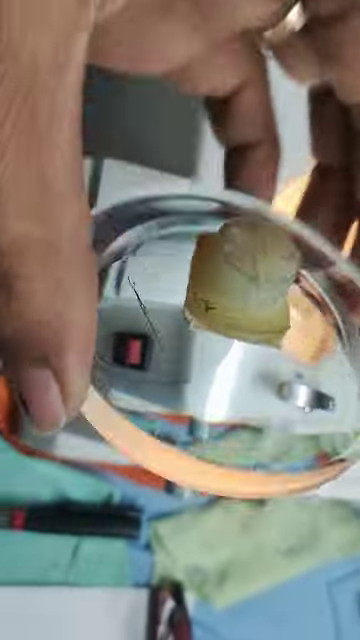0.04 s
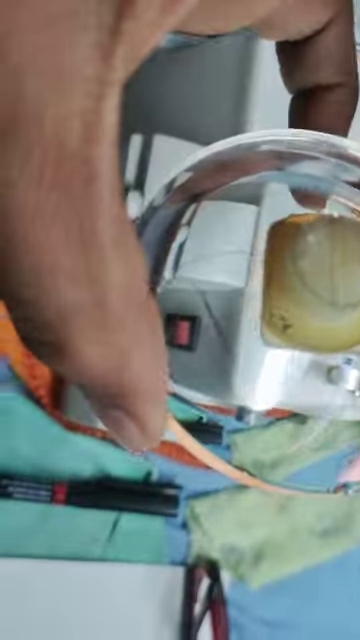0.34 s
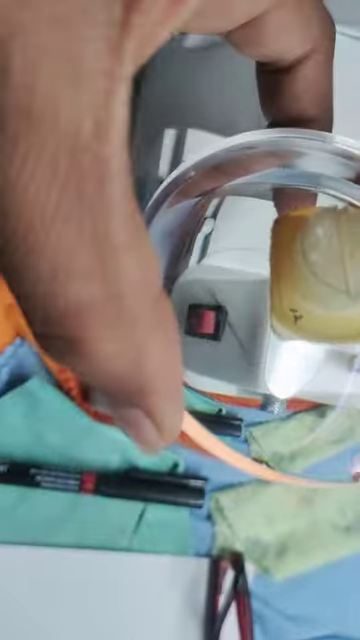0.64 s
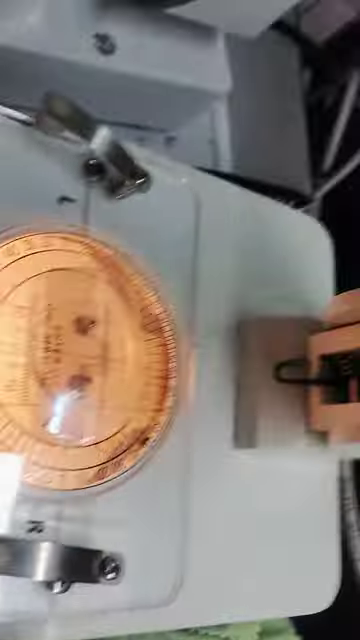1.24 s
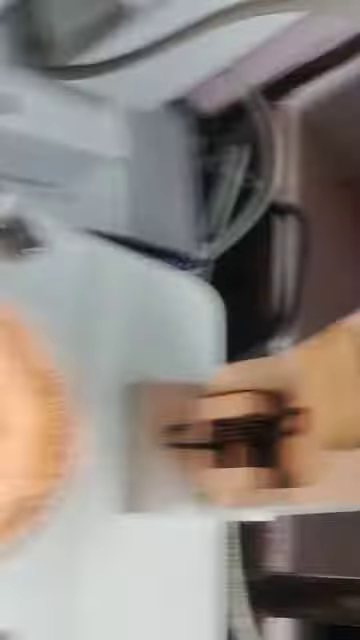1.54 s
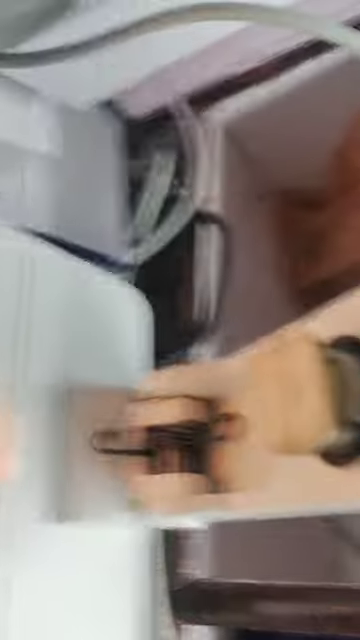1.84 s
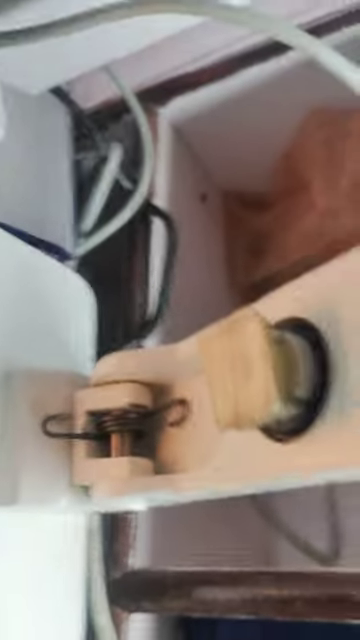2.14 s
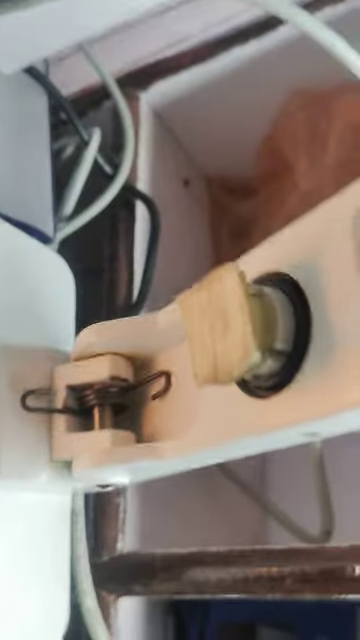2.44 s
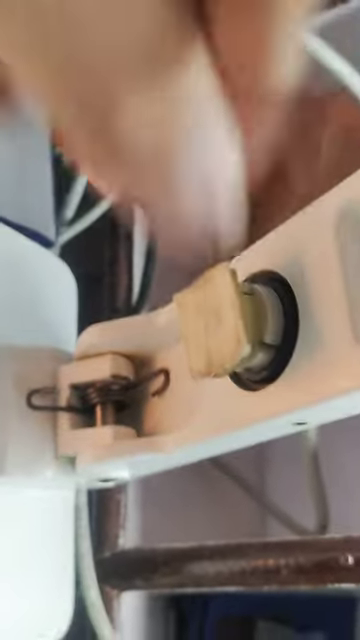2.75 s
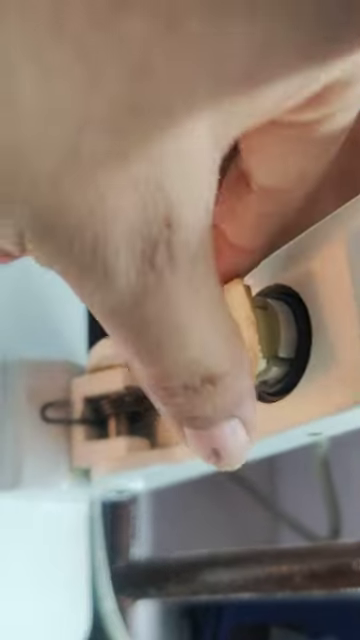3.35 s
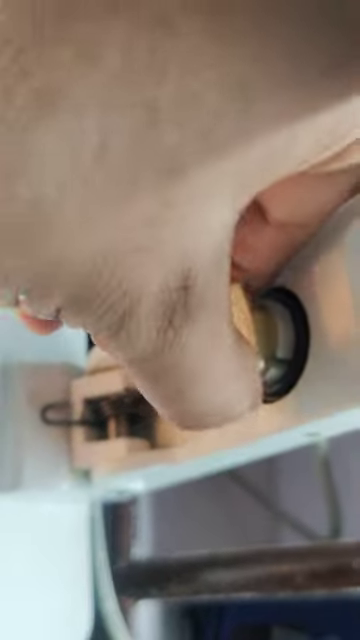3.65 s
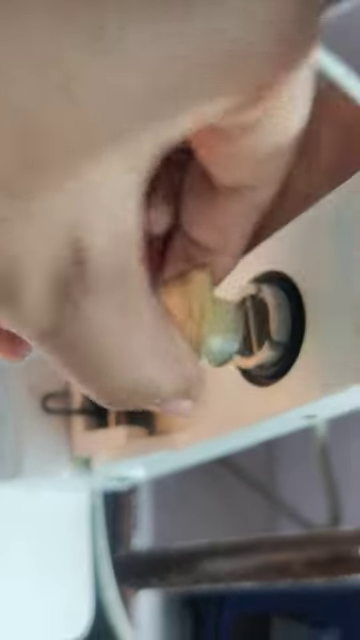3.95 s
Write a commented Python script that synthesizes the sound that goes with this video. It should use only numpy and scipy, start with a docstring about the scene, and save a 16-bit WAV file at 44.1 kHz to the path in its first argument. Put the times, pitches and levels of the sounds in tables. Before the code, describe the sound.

Close grinding machine whine stops suddenly, leaving light handling scrapes, ticks and a low rumble.

```python
"""A lens grinding machine runs close by: a harmonic motor whine over a rasping wheel, whose friction
noise is shaped by the resonances of the housing. An edit cuts it off abruptly. Hands then brush and tap
the housing and the camera, with scrapes, stick-slip squeaks, ticks and dull knocks. A far engine swells
twice through the walls, over the low rumble of a small workshop. The right channel is muffled."""
import sys
import numpy as np
from scipy import signal
from scipy.fft import rfft, irfft
from scipy.io import wavfile

SR = 44100
rng = np.random.default_rng(int(sys.argv[2]) if len(sys.argv) > 2 else 0)


def output_pcm(signal):
    """Save a mono or channel-first signal as 16-bit PCM at the path in sys.argv[1].

    Samples are clipped to [-1, 1] before scaling.
    """
    pcm = np.clip(np.atleast_2d(signal).T, -1, 1) * 32767
    wavfile.write(sys.argv[1], SR, np.round(pcm).astype(np.int16))


N = 176400
T, HZ = np.arange(N) / SR, np.fft.rfftfreq(N, 1 / SR)

CUT_S, CUT_FADE_S = 0.8645, 0.0017
MOTOR_HZ, SAG_HZ_PER_S = 164.1, 0.8
def grinder():
    """Rotation: one shaft paces whine and rasp; the sound eases slightly until an edit cuts it off."""
    shaft_phase = phase(MOTOR_HZ - SAG_HZ_PER_S * T + 0.15 * drift(14))
    whine = motor_whine(shaft_phase) * amp(-2.5 * T)
    grinding = (side_tones() + wheel_rasp(shaft_phase)) * amp(-0.5 * T)
    rings = wheel_rings() * amp(-18.5 * T)
    cut_gate = np.exp(-np.maximum(T - CUT_S, 0) / CUT_FADE_S)
    return cut_gate * (whine + grinding + rings)


# Harmonics of the shaft rate: harmonic_number, relative_db
MOTOR_HARMONICS = [(1, -11.5), (2, -5.5), (3, 3), (4, -5), (5, 0.5), (6, 0.5), (7, 1.5), (8, 1), (9, -16),
                   (10, -17), (11, -4), (12, 3), (13, -10.5), (14, -10), (15, -21), (17, -7), (18, -6)]
# The fifth harmonic starts strong and sinks: time_s, gain_db
FIFTH_FADE = [(0.24, 5.5), (0.44, -2.5)]
def motor_whine(shaft_phase, level_db=-26):
    """Periodic motion radiates a harmonic series; each partial wavers slightly in level."""
    whine = np.zeros(N)
    for harmonic, db in MOTOR_HARMONICS:
        if harmonic == 5:
            db = db + np.interp(T, *np.transpose(FIFTH_FADE))
        whine += amp(db + 0.8 * drift(37)) * np.cos(harmonic * shaft_phase + 2 * np.pi * rng.random())
    return amp(level_db) * unit(whine)


# Friction spectrum of the wheel: frequency_hz, relative_db
RASP_SPECTRUM = [(60, -18), (130, -5.5), (250, -11.5), (800, -0.5), (3000, 0.5), (6500, -0.5), (8200, -6),
                 (12500, -18.5), (15500, -4)]
# Resonances and antiresonances of the housing: centre_hz, half_width_hz, gain_db
HOUSING_MODES = [(529, 37, 13.5), (605, 21, -9), (697, 28, 10.5), (790, 38, -5.5), (1046, 147, 10.5),
                 (1540, 51, -5.5), (1685, 176, 9.5), (1883, 45, 10), (2930, 130, -9), (3605, 250, 6),
                 (3916, 71, 8.5), (4320, 38, 9.5), (4984, 115, -41), (5480, 52, -14), (6030, 140, 5),
                 (8350, 100, -10), (9400, 130, -15), (10480, 990, 8.5), (10870, 180, -15)]
def wheel_rasp(shaft_phase, level_db=-22.5, treble_hz=2850, dulling_db_per_s=7):
    """Source and filter: friction noise, coloured by the housing, pulses with each turn and dulls."""
    housing_db = sum(db * bell(HZ, hz, width) for hz, width, db in HOUSING_MODES)
    rasp = casing_reflections(noise(spectrum(RASP_SPECTRUM) + housing_db))
    rasp *= 1 + 0.048 * np.cos(shaft_phase)
    treble = irfft(rfft(rasp) / (1 + (treble_hz / (HZ + 1)) ** 4), N)
    treble_gain = amp(0.5 * drift(52) - dulling_db_per_s * T)
    return amp(level_db) * (rasp - treble + treble * treble_gain)


def casing_reflections(direct, decay_s=0.01, echo_db=-1):
    """Interference: dense, short reflections in the casing add to the direct sound, most in the treble."""
    echoes = rng.standard_normal((2, 1024)) * np.exp(-T[:1024] / decay_s)
    echoes /= np.linalg.norm(echoes, axis=1, keepdims=True)
    response = rfft(echoes, N) * np.clip(HZ / 6000, 0, 1)
    return irfft(rfft(direct) * (1 + amp(echo_db) * response), N)


# Shrill resonances of the wheel: centre_hz, half_width_hz, initial_level_db
WHEEL_MODES = [(5750, 45, -29.5), (7456, 56, -31)]
def wheel_rings():
    """Resonance: lightly damped modes driven by noise ring in narrow bands."""
    return sum(amp(db) * noise(-20 * np.log10(1 + ((HZ - hz) / width) ** 2))
               for hz, width, db in WHEEL_MODES)


# Fainter tones of the machine: pitch_hz, initial_level_db
SIDE_PARTIALS = [(447, -47.5), (1727, -42.5), (1878, -39.5), (3564, -40.5), (5728, -40), (7476, -41)]
def side_tones():
    """Random amplitude and phase modulation make the fainter partials waver."""
    return sum(amp(db + 1.1 * drift(53)) * np.cos(2 * np.pi * hz * T + 0.64 * drift(17))
               for hz, db in SIDE_PARTIALS)


# Skin brushing the housing: centre_s, half_length_s, scrape_db, hiss_db
STROKES = [(1.059, 0.035, -38, -40), (1.16, 0.038, -49, -52.5), (1.227, 0.031, -48, -44),
           (1.32, 0.028, -39.5, -39), (1.363, 0.032, -46.5, -42), (1.448, 0.03, -36, -40.5),
           (1.498, 0.028, -35, -40), (1.647, 0.02, -56, -50.5), (1.709, 0.031, -50, -53.5),
           (1.802, 0.0039, -43, -49), (1.813, 0.044, -42, -48.5), (1.945, 0.024, -42, -40.5),
           (1.998, 0.021, -43.5, -40.5), (2.077, 0.048, -44, -54), (2.212, 0.057, -39.5, -39.5),
           (2.32, 0.063, -45.5, -46.5), (2.453, 0.13, -78, -62)]
# Spectra of the dull scrape and the fine hiss: frequency_hz, relative_db
SCRAPE_SPECTRUM = [(100, 12), (350, -4.5), (700, 2), (1500, -2), (2800, -3), (5000, -16), (9000, -26),
                   (16000, -48)]
HISS_SPECTRUM = [(500, -32), (2500, -24), (4500, -7), (7200, -0.5), (9000, -7), (12000, -3), (15500, 1)]
def rubs(slips_per_s=2100, slip_share=0.44):
    """Sliding friction: many tiny slips merge into scrape and hiss as each stroke swells and fades."""
    slips = impulses(slips_per_s) * rng.choice([-1, 1], (2, N))
    slip_db = 2.5 * np.minimum(rng.exponential(1, (2, N)), 4)
    drive = slip_share * unit(slips * amp(slip_db)) + (1 - slip_share) * rng.standard_normal((2, N))
    scrape_gain = sum(amp(db) * bell(T, s, half) for s, half, db, _ in STROKES)
    hiss_gain = sum(amp(db) * bell(T, s, half) for s, half, _, db in STROKES)
    scrape = scrape_gain * noise(spectrum(SCRAPE_SPECTRUM), drive)
    hiss = hiss_gain * noise(spectrum(HISS_SPECTRUM), drive)
    return (scrape + hiss) * amp(2.3 * drift(67))


# The grip shifts on the camera: centre_s, half_length_s, level_db
GRIP_SHIFTS = [(1.438, 0.068, -39), (1.822, 0.027, -45), (2.243, 0.1, -32.5)]
# Spectrum of that rubbing: frequency_hz, relative_db
GRIP_SPECTRUM = [(40, -16), (130, 8.5), (220, -10.5), (420, -8), (700, -42), (2000, -44)]
def grip(snaps_per_s=300):
    """Structure-borne friction of the holding hand: low rubbing, a faint slide and sparse crackle."""
    shifting = sum(amp(db) * bell(T, s, half) for s, half, db in GRIP_SHIFTS)
    rubbing = shifting * noise(spectrum(GRIP_SPECTRUM))
    snaps = impulses(snaps_per_s) * rng.uniform(-1, 1, (2, N))
    slide = amp(-58 + drift(26)) * noise(spectrum(HISS_SPECTRUM))
    crackle = amp(-60) * noise(spectrum(HISS_SPECTRUM), snaps)
    handling = np.exp(-((T - 1.7) / 0.91) ** 4)  # flat-topped, from about 0.8 to 2.6 s
    return rubbing + (slide + crackle) * handling


# Fingertip squeaks: start_s, length_s, from_hz, to_hz, level_db, octave_relative_db
FINGER_SQUEAKS = [(1.35, 0.022, 476, 373, -34.5, -28), (1.503, 0.0174, 477, 738, -28, -11)]
def squeak(length_s, from_hz, to_hz, level_db, octave_db, jitter=0.19):
    """Stick-slip oscillation: a fingertip catches and releases in a short, uneven glide."""
    progress = np.arange(0, length_s, 1 / SR) / length_s
    glide_hz = from_hz + (to_hz - from_hz) * progress
    angle = phase(glide_hz * (1 + jitter * drift(400)[:len(progress)]))
    tone = unit(np.sin(angle) + amp(octave_db) * np.sin(2 * angle))
    return amp(level_db) * np.sin(np.pi * progress) * tone


# Ticks of fingernail and plastic: start_s, body_db, body_hz, decay_cycles, click_db
NAIL_TICKS = [(0.9933, -19, 1500, 0.5, -35), (1.5171, -15, 7400, 0.69, -20), (1.796, -17.5, 1500, 0.3, -52),
              (1.886, -37, 5000, 0.5, -21), (2.0038, -23, 6450, 1.8, -46), (2.329, -38, 5500, 0.5, -24.5),
              (2.4066, -30, 4200, 0.85, -38), (2.4365, -22, 5100, 0.61, -28), (2.4697, -35, 4010, 0.4, -28),
              (2.478, -48, 4000, 0.4, -32), (2.9605, -54, 4000, 0.4, -41), (3.139, -48, 2987, 0.4, -45)]
def tick(body_db, body_hz, decay_cycles, click_db):
    """Impact excitation: a hard contact sets off a body mode and a bright click."""
    click = damped_mode(click_db, hz=13900, decay_cycles=2.3)
    return damped_mode(body_db, body_hz, decay_cycles) + click


def damped_mode(level_db, hz, decay_cycles):
    """Free vibration: a struck mode decays exponentially within a few cycles."""
    cycles = hz * T[:2048]
    return amp(level_db) * np.exp(-cycles / decay_cycles) * np.sin(2 * np.pi * cycles)


# Soft knocks on the camera body: start_s, peak_db, pitch_hz
SOFT_KNOCKS = [(1.354, -33, 288), (1.516, -26.5, 274), (1.7947, -24, 165), (2.1234, -26, 276)]
def knock(peak_db, pitch_hz, rise_cycles=0.25):
    """Heavy damping: a padded blow gives a low wobble that swells and dies at once."""
    cycles = pitch_hz * T[:4096]
    envelope = cycles / rise_cycles * np.exp(1 - cycles / rise_cycles)
    return amp(peak_db) * envelope * np.sin(2 * np.pi * cycles)


# Course of the far engine: time_s, firing_hz, level_db
ENGINE_COURSE = [(2.0, 123, -58), (2.12, 124.7, -34), (2.221, 132.6, -47.5), (2.27, 137.5, -31),
                 (2.32, 135, -35.5), (2.58, 124.7, -47), (2.652, 130.3, -27), (2.74, 141, -33.5),
                 (2.85, 139.7, -30.5), (2.979, 138.6, -30), (3.18, 128, -29), (3.24, 125.3, -40.5),
                 (3.44, 122.9, -39.5), (3.598, 125.1, -30.5), (3.77, 131.7, -27), (4.0, 122, -35)]
def far_engine(octave_db=-28.5):
    """Transmission loss: only the firing rate and a trace of its octave come through the walls."""
    time_s, firing_hz, level_db = np.transpose(ENGINE_COURSE)
    angle = phase(np.interp(T, time_s, firing_hz) + 0.8 * drift(23))
    gain = amp(np.interp(T, time_s, level_db, left=-100) + 0.8 * drift(17))
    return gain * unit(np.sin(angle) + amp(octave_db) * np.sin(2 * angle))


# Droning bands of the room: centre_hz, half_width_hz, initial_db, swell_db, final_db
RUMBLE_BANDS = [(28, 12.3, -39, -35.5, -33.5), (46.5, 7.1, -40, -35, -47), (96, 28, -48.5, -42.5, -48),
                (134.8, 11.6, -50, -41, -47), (165.3, 13, -50.5, -39.5, -42.5)]
# Spectrum of the room air: frequency_hz, relative_db
AIR_SPECTRUM = [(20, -35), (200, -1), (400, 2.5), (600, -3), (1300, -5.5), (1700, -7.5), (2400, -7.5),
                (3400, -13), (4500, -22), (6500, -24.5), (8300, -37.5), (11000, -35.5), (15000, -33)]
def room(swell_s=3.02, air_db=-46.5):
    """Ambient noise: dull broadband air over narrow bands of rumble that swell after the abrupt cut."""
    rumble = np.zeros((2, N))
    for hz, width, *levels_db in RUMBLE_BANDS:
        band = noise(-10 * np.log10(1 + ((HZ - hz) / width) ** 6))
        rumble += band * amp(np.interp(T, [CUT_S, swell_s, T[-1]], levels_db))
    return rumble + amp(air_db + 0.5 * drift(2)) * noise(spectrum(AIR_SPECTRUM))


# Likeness of left and right, capped at 1 in use: frequency_hz, correlation
STEREO_CORRELATION = [(60, 1.5), (300, 0.5), (1000, 0), (2500, 0), (12000, -0.3)]
def noise(colour_db, drive=None):
    """Spectral shaping: white noise, or a given drive, becomes two partly coherent channels of rms 1."""
    left, independent = rfft(rng.standard_normal((2, N)) if drive is None else drive)
    correlation = np.clip(spectrum(STEREO_CORRELATION), -1, 1)
    right = correlation * left + np.sqrt(1 - correlation ** 2) * independent
    return unit(irfft(np.array([left, right]) * amp(colour_db), N))


def drift(rate_hz):
    """Random fluctuation: low-passed noise of rms 1."""
    return unit(irfft(rfft(rng.standard_normal(N)) * bell(HZ, 0, rate_hz), N))


def impulses(per_s):
    """Poisson process: independent random impulses in two channels."""
    return rng.random((2, N)) < per_s / SR


def spectrum(points):
    """Interpolates (frequency_hz, value) points along a logarithmic frequency axis."""
    hz, value = np.transpose(points)
    return np.interp(np.log(HZ + 1), np.log(hz), value)


def phase(hz):
    """Phase in radians is the integral of frequency."""
    return 2 * np.pi * np.cumsum(hz) / SR


def bell(x, centre, half_width):
    """Gaussian curve that falls to 1/e at half_width from its centre."""
    return np.exp(-((x - centre) / half_width) ** 2)


def amp(db):
    """Decibels to amplitude ratio."""
    return 10 ** (np.asarray(db) / 20)


def unit(x):
    """Normalises to rms 1."""
    return x / np.sqrt(np.mean(x ** 2) + 1e-20)


def play(source, events):
    """Sounds the source once for each row, at that row's start_s."""
    track = np.zeros(N)
    for start_s, *settings in events:
        sound = source(*settings)
        span = track[round(start_s * SR):][:len(sound)]
        span += sound[:len(span)]
    return track


def scene():
    """Superposition: machine, hands and background add at the microphone."""
    machine = grinder()
    hands = rubs() + grip()
    hands += play(squeak, FINGER_SQUEAKS) + play(tick, NAIL_TICKS) + play(knock, SOFT_KNOCKS)
    return machine + hands + room() + far_engine()


# Level difference between the microphone ports: frequency_hz, left_minus_right_db
PORT_IMBALANCE = [(50, 16.7), (300, 18), (700, 16.6), (1400, 23.2), (3000, 23), (9000, 19), (14000, 21)]
def record(dry, cutoff_hz=15620):
    """Attenuation: the muffled right port tips the balance to the left; a low-pass limits the band."""
    right_ratio = amp(-spectrum(PORT_IMBALANCE))
    port_gains = 2 * np.array([1 / (1 + right_ratio), right_ratio / (1 + right_ratio)])
    ports = irfft(rfft(dry) * port_gains, N)
    lowpass = signal.firwin(511, cutoff_hz, window=("kaiser", 9), fs=SR)
    return signal.oaconvolve(ports, lowpass[None], "same")


dry = scene()
out = record(dry)
output_pcm(out)
```